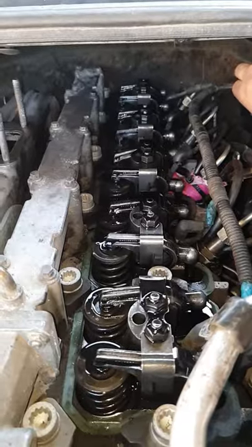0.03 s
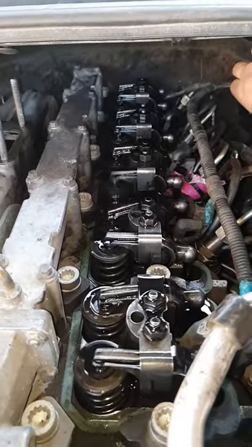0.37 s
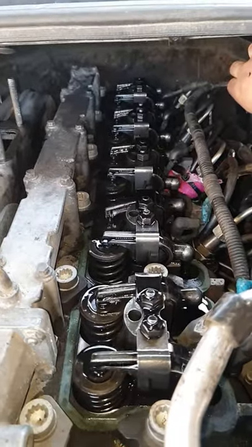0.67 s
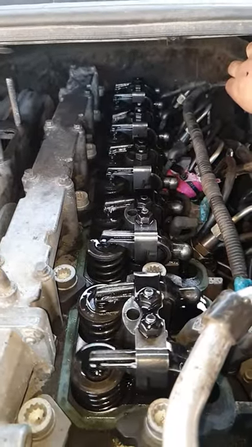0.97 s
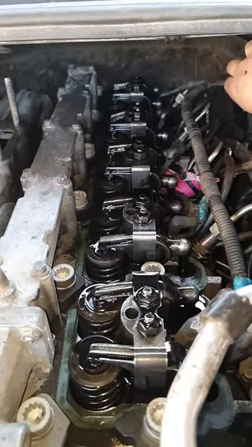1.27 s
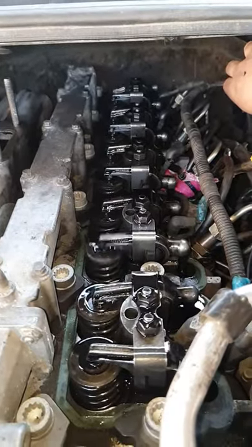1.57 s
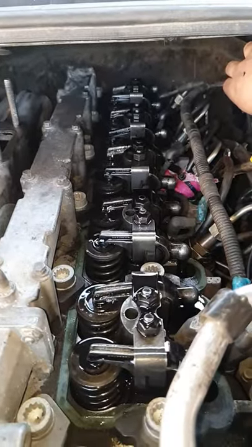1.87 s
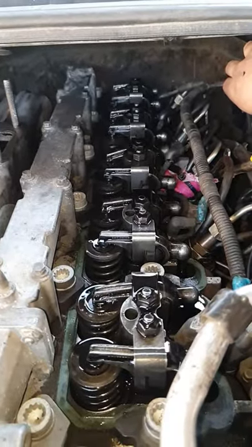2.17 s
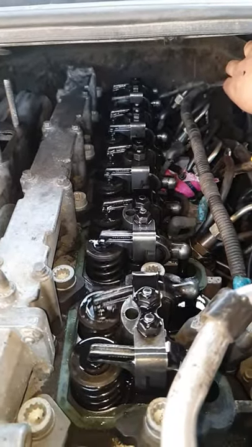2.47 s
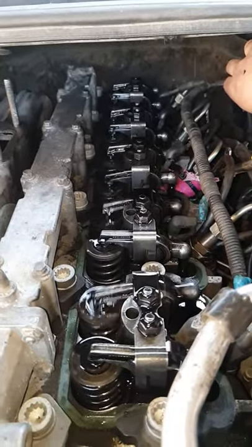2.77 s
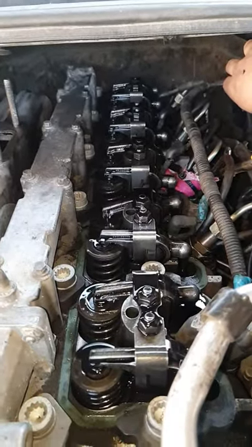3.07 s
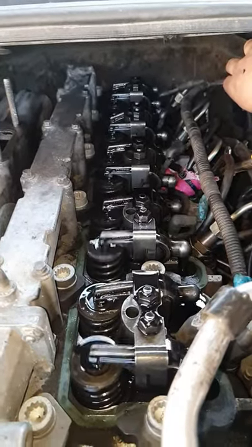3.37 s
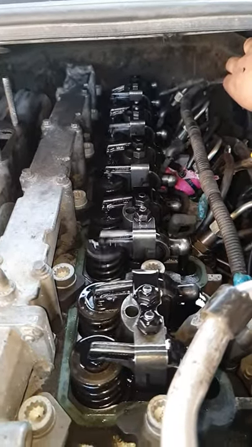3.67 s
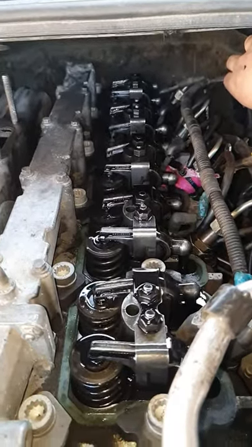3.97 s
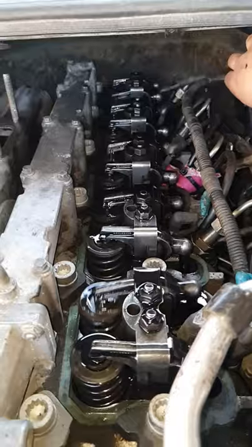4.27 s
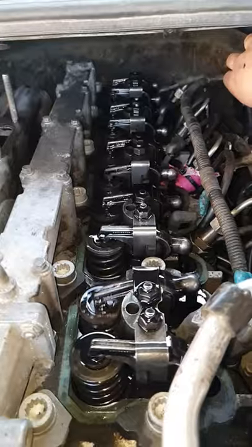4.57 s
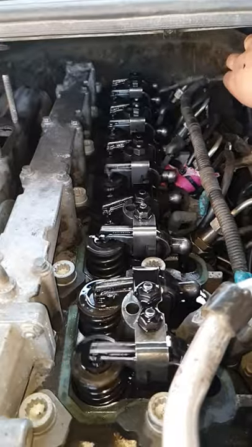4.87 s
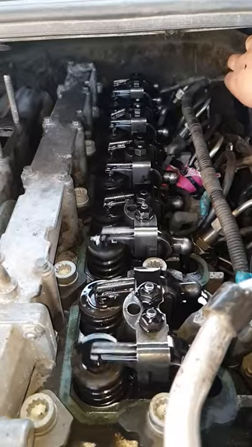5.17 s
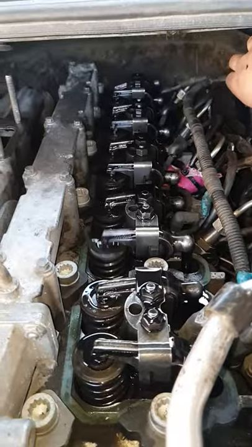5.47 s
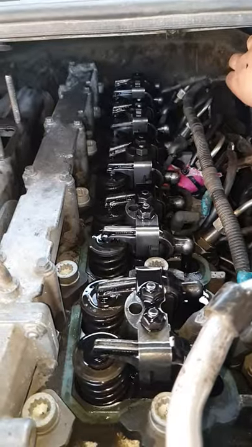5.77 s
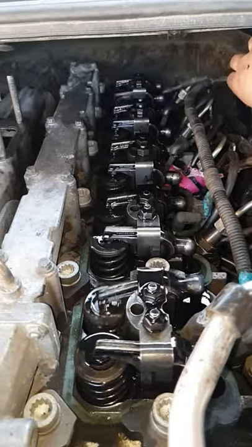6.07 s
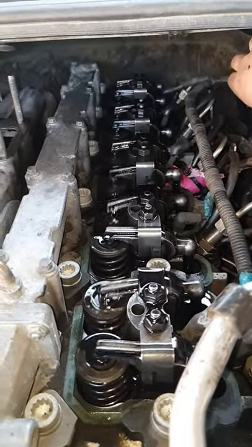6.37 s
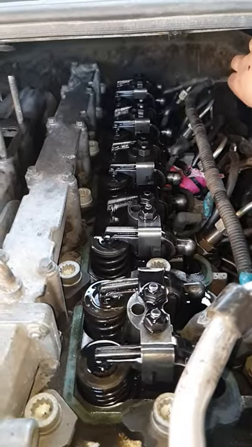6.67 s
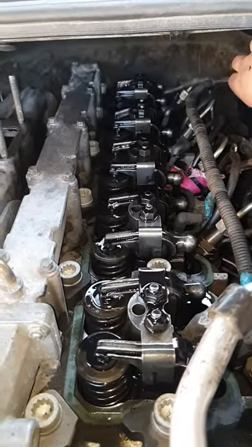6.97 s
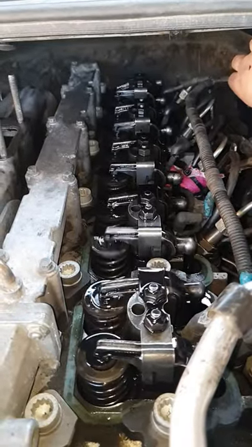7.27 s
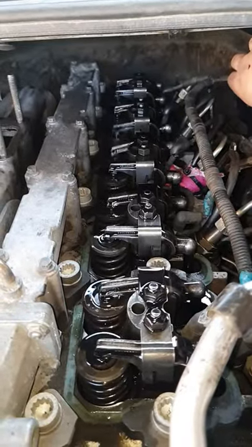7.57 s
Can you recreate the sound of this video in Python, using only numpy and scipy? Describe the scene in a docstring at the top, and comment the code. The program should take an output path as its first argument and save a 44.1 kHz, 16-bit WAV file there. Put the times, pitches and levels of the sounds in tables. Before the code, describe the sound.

Close, bright clatter of exposed rockers over the low throb, dull knocks and light hiss of an idling diesel engine.

```python
"""A diesel engine idles with its valve cover off, heard from just above the rockers.
From the start, air and oil hiss over the throb of a belt-driven fan, and each four-stroke cycle repeats
one pattern of impacts: bright ticks in the valve gear, dull knocks in the block, a dry combustion crack.
After a second the idle begins to creep up, and at about three seconds the crack softens.
The speed peaks at six seconds and then sinks back a little."""
import sys
import numpy as np
from scipy import signal
from scipy.fft import rfft, irfft, next_fast_len
from scipy.io import wavfile
from scipy.ndimage import uniform_filter1d

SR = 44100
rng = np.random.default_rng(int(sys.argv[2]) if len(sys.argv) > 2 else 0)


def wrap_up_sound(samples):
    """Save the sound to the file named by the first command line argument, as 16-bit audio."""
    columns = np.atleast_2d(samples).T
    # keep every value between -1 and 1, then stretch to whole-number steps
    tamed = np.clip(columns, -1, 1)
    steps = np.round(tamed * 32767).astype(np.int16)
    wavfile.write(sys.argv[1], SR, steps)


N = 345303
TIME = np.arange(N) / SR

# idle speed: t/s, crank speed/rpm
IDLE_SPEED = [(0, 1230.8), (1.07, 1234.4), (2.28, 1259.8), (3.09, 1256.6), (3.38, 1263.9), (4.38, 1260.2),
              (5.22, 1275.2), (6, 1278.1), (7.83, 1248)]
# blows of one cycle: crank angle/deg, then level/dB into the low, middle and high body modes
BLOWS = [(1.017, 50.6, 43.1, 37.64), (28.97, 10.0, 34.5, 27.7), (96.08, 34.2, 37.5, 25.4),
         (143.6, 45.3, 38, 29.3), (212.2, 12, 34.7, 27.6), (293.76, 48.5, 44.05, 34.7),
         (346.9, 17, 31.8, 30.3), (363.06, 38, 31.7, 24), (444, 15, 39.5, 11), (584.4, 49.3, 23.8, 25.8)]


def from_db(db):
    """Amplitude ratio: tenfold for every 20 dB."""
    return 10 ** (np.asarray(db) / 20)


def unit_rms(x):
    """Normalisation to unit mean power."""
    return x / np.sqrt(np.mean(x ** 2) + 1e-20)


def colour(x, spectrum, keep_power=True):
    """Spectral shaping; with keep_power, white noise retains its power."""
    size = next_fast_len(N + SR // 4)
    hz, level_db = np.transpose(spectrum)
    log_f = np.log(np.arange(size // 2 + 1) * SR / size + 1)
    gain = from_db(np.interp(log_f, np.log(hz), level_db, right=-100 if keep_power else None))
    return irfft(rfft(x, size) * (unit_rms(gain) if keep_power else gain), size)[..., :N]


def drift(rate_hz):
    """Slow random modulation: straight lines between Gaussian values."""
    knots = rng.standard_normal(400)
    return np.interp(TIME * rate_hz, np.arange(len(knots)), knots)


def resonance(x, hz, width_hz):
    """A damped oscillator: two poles, unit gain at the peak."""
    r = np.exp(-np.pi * width_hz / SR)
    feedback = [1, -2 * r * np.cos(2 * np.pi * hz / SR), r * r]
    return signal.lfilter(np.array([1, 0, -1]) * (1 - r * r) / 2, feedback, x + 1e-18)


def crank():
    """Phase is the integral of speed: times, and the cycles (two turns each) done by then."""
    t = np.arange(-SR // 4, N + SR // 4, 40) / SR
    cycles = np.cumsum(np.interp(t, *np.transpose(IDLE_SPEED))) * (t[1] - t[0]) / 120
    first_cycle_s = .0786
    return t, cycles - np.interp(first_cycle_s, t, cycles)


def onsets(degrees, jitter_ms):
    """Periodic excitation with play: the samples at which the crank passes an angle, once a cycle."""
    t, cycles = crank()
    passes = np.interp(np.arange(-1, int(cycles[-1])) + degrees / 720, cycles, t)
    return np.round(SR * (passes + jitter_ms / 1000 * rng.standard_normal(len(passes)))).astype(int)


def add(track, starts, bursts):
    """Superposition of bursts (cycles x samples) on a track."""
    at = starts[:, None] + np.arange(bursts.shape[-1])
    inside = (at >= 0) & (at < N)
    track[at[inside]] += bursts[inside]


def air_and_oil(rumble_left_db, rumble_right_db, coherence, hiss_db):
    """Broadband flow noise: the fan's draught rumbles, partly coherent; belts and oil spray hiss."""
    # noise spectra: f/Hz, relative level/dB
    rumble_spectrum = [(20, -20), (35, -20), (55, -3), (100, -1), (170, -2), (260, -13.5), (420, -15.5),
                       (700, -17), (1000, -27.5), (1500, -72)]
    hiss_spectrum = [(500, -3.5), (900, -3.5), (1400, -3.5), (2000, 1), (2600, -1), (3400, -4), (4700, -8),
                     (5800, -4), (6650, -1), (7900, -14.5), (9700, -2.5), (12000, -12.5), (15500, -18)]
    common = np.sqrt(coherence) * rng.standard_normal(N)
    draught = common + np.sqrt(1 - coherence) * rng.standard_normal((2, N))
    rumble = from_db([[rumble_left_db], [rumble_right_db]]) * colour(draught, rumble_spectrum)
    return rumble + from_db(hiss_db) * colour(rng.standard_normal((2, N)), hiss_spectrum)


def fan_throb(turns_per_cycle, waver_db):
    """Rotational noise: the fan, driven by the crank, sounds harmonics of its turning rate."""
    # fan tones: harmonic number, left level/dB, right level/dB
    harmonics = [(2, -45, -34.5), (3, -31, -28.5), (5, -34, -18.5), (7, -30, -48.5), (10, -32, -46)]
    angle = 2 * np.pi * turns_per_cycle * np.interp(TIME, *crank())
    throb = np.zeros((2, N))
    for order, left_db, right_db in harmonics:
        level_db = np.array([[left_db], [right_db]]) + waver_db * drift(rate_hz=10)
        throb += np.sqrt(2) * from_db(level_db) * np.sin(order * angle + 2 * np.pi * rng.random())
    return throb


def firing_hum(level_db, firings_per_cycle):
    """The fundamental of the firing rate: one soft pressure swing for each firing."""
    phase = 2 * np.pi * firings_per_cycle * np.interp(TIME, *crank())
    return np.sqrt(2) * from_db(level_db) * np.sin(phase)


def tick_envelope(t_ms, swell_ms, rattle_db=-10, decay_ms=9.8):
    """Powers add: a Gaussian swell at contact, then the dying rattle of spring and pushrod."""
    contact_power = np.exp(-(t_ms / swell_ms) ** 2)
    rattle = from_db(rattle_db) * np.exp(-np.maximum(t_ms, 0) / decay_ms)
    rattle_onset = (1 + np.tanh(t_ms / swell_ms)) / 2
    return np.sqrt(contact_power + rattle ** 2 * rattle_onset)


def valve_ticks(clack_db, ring_db, sizzle_db, ring_width_hz=910, jitter_ms=.22, uneven_db=.97):
    """Impact noise: a burst of tiny rebounds excites a clack, a rocker's ring and a steel sizzle."""
    # contacts of one cycle: crank angle/deg, swell t/ms, clack, ring and sizzle level/dB, ring f/Hz
    contacts = [(16.78, 0.97, -32, -27, -30, 6660), (42.03, 3.6, -31, -30.5, -27, 6550),
                (143.3, 1.4, -31.5, -27.5, -27.5, 6760), (195.3, 1.28, -30.5, -27.5, -29.5, 6780),
                (274.6, 0.9, -31, -21, -23.5, 6710), (301.4, 0.9, -32, -53, -41, 6500),
                (340, 0.81, -44.5, -30.5, -34.5, 6570), (480, 1.16, -33, -26.5, -31.5, 6400),
                (525.4, 1.5, -34.5, -25, -28, 6520), (591, 1.7, -38, -33.5, -30.5, 6550),
                (632.4, 2, -30.5, -31, -34, 6790), (699.3, 1.5, -26.5, -25, -29.5, 6680)]
    # contact spectra: f/Hz, relative level/dB
    clack_spectrum = [(700, -18), (1200, -2.5), (1500, -7), (2500, -6.5), (3600, -8.5), (4150, 2.5),
                      (4600, -7), (5400, 0.5), (5900, -5.5), (6500, -20)]
    sizzle_spectrum = [(7000, -15.5), (7800, -10), (8500, -5), (8900, -7), (9650, -0.5), (10300, -5),
                       (10600, -3), (11500, -8.5), (13000, -10.5), (15500, -16)]
    right_loss_db = (5, 2.5, 2)  # clack, ring, sizzle: the rockers lie nearer the left port
    grain_db, lead = 2.0, SR // 125
    t_ms = 1000 * np.arange(-lead, 3 * lead) / SR
    ring_gain = np.sqrt(2 * SR / np.pi / ring_width_hz)  # restores the power lost in the narrow band
    tracks = np.zeros((3, 2, N))
    for degrees, swell_ms, *parts_db, hz in contacts:
        at = onsets(degrees, jitter_ms) - lead
        rebounds = rng.standard_normal((3, 2, len(at), len(t_ms)))
        roughness = unit_rms(uniform_filter1d(rng.standard_normal((len(at), len(t_ms))), size=16))
        grains = unit_rms(from_db(grain_db * roughness))
        force = from_db(uneven_db * rng.standard_normal((len(at), 1)))
        bursts = rebounds * grains * force * tick_envelope(t_ms, swell_ms)
        bursts[1] = ring_gain * resonance(resonance(bursts[1], hz, ring_width_hz), hz, ring_width_hz)
        for part, (part_db, loss_db) in enumerate(zip(parts_db, right_loss_db)):
            add(tracks[part, 0], at, from_db(part_db) * bursts[part, 0])
            add(tracks[part, 1], at, from_db(part_db - loss_db) * bursts[part, 1])
    clack, ring, sizzle = tracks
    return (from_db(clack_db) * colour(clack, clack_spectrum) + from_db(ring_db) * ring
            + from_db(sizzle_db) * colour(sizzle, sizzle_spectrum))


def engine_bay(x, t60_s, wet_db):
    """Reverberation: dense short reflections from the metal all around, different at each port."""
    t = TIME[:SR // 8]
    tail = rng.standard_normal((2, len(t))) * from_db(-60 * t / t60_s)
    tail /= np.sqrt(np.sum(tail ** 2, axis=1, keepdims=True))
    return x + from_db(wet_db) * signal.fftconvolve(x, tail, axes=1)[:, :N]


def block_knocks(middle_db, high_db, level_db, jitter_ms=.03, uneven_db=.6):
    """Modal ringing: firings and piston slap strike block and head, a little differently each cycle."""
    # modes of block and head: f/Hz, bandwidth/Hz, level/dB
    modes = [(120, 44.8, -18), (179.2, 70.6, -14.5), (216.4, 28.6, -19), (315, 153, -27.5), (359, 14, -22),
             (379.2, 71.2, -4), (419.1, 48.6, 0.5), (438.2, 15.3, -3.5), (550, 91, -15.5),
             (619.4, 17.3, -5.5), (675.8, 23.9, 2.5), (896, 15, -16.5), (1122, 19, -22), (1232, 28, -24)]
    band_edges_hz = (260, 480)  # between the low, middle and high modes
    drive = np.zeros((3, N))
    for degrees, *strengths_db in BLOWS:
        at = onsets(degrees, jitter_ms)
        for track, strength_db in zip(drive, strengths_db):
            add(track, at, from_db(strength_db + uneven_db * rng.standard_normal((len(at), 1))))
    drive[1:] *= from_db([middle_db, high_db])
    ringing = np.zeros(N)
    for k, (hz, width_hz, mode_db) in enumerate(modes):
        band = np.searchsorted(band_edges_hz, hz)
        polarity = (-1) ** (k + 1)
        ringing += polarity * from_db(mode_db) * resonance(drive[band], hz, width_hz)
    return from_db(level_db) * ringing


def combustion_crack(crack_db, decay_ms, slap_db, slap_hz, slap_width_hz):
    """A heavily damped transient: the hardest firing opens each cycle with a slap and a dry crack."""
    # spectrum of the crack: f/Hz, relative level/dB
    crack_spectrum = [(500, -12), (650, -1), (800, -6), (1000, -14), (1250, -3), (1600, -15), (3000, -18)]
    at = onsets(BLOWS[0][0], jitter_ms=0)
    crack, impulses = np.zeros((2, N))
    t_ms = 1000 * TIME[:SR // 40]
    add(crack, at, rng.standard_normal((len(at), len(t_ms))) * np.exp(-t_ms / decay_ms))
    add(impulses, at, np.ones((len(at), 1)))
    slap = resonance(resonance(impulses, slap_hz, slap_width_hz), slap_hz, slap_width_hz)
    return from_db(crack_db) * colour(crack, crack_spectrum) + from_db(slap_db) * slap


def shadowed_port(x, lag_ms):
    """Acoustic shadow: sound reaches the right microphone port later and filtered."""
    # response of the right port: f/Hz, level/dB relative to the left
    shadow = [(100, 1.5), (200, -0.5), (400, -0.5), (620, -2), (800, -5.5), (1100, -5.5), (2000, 2.5),
              (2600, 0), (3150, -12.5), (6000, -5.5), (7200, -8.5), (8100, -16), (10200, -3.5), (15500, 0)]
    return np.interp(TIME - lag_ms / 1000, TIME, colour(x, shadow, keep_power=False))


def scene():
    """Superposition of all sources at the two microphone ports."""
    # the knock softens as the idle settles: t/s, relative crack level/dB
    harshness = [(0, 1.5), (2.9, 1.5), (3.3, -2.5), (6.9, -2), (7.5, -2.5)]
    harsh_db = np.interp(TIME, *np.transpose(harshness))
    rpm = np.interp(TIME, *np.transpose(IDLE_SPEED))
    middle_db = -1.47 + .035 * (rpm - rpm.mean())  # middle modes are struck harder at higher speed
    knocks = block_knocks(middle_db, high_db=-4.0 + .17 * harsh_db, level_db=-.88)
    crack = combustion_crack(crack_db=-24, decay_ms=2.15, slap_db=28.5, slap_hz=652, slap_width_hz=147)
    ticks = from_db(.21 * harsh_db) * valve_ticks(clack_db=.13, ring_db=-.26, sizzle_db=-.23)
    ticks = engine_bay(ticks, t60_s=.068, wet_db=-11.0)
    air = air_and_oil(rumble_left_db=-30.5, rumble_right_db=-21.0, coherence=.45, hiss_db=-34.5)
    left, right = air + ticks + knocks + from_db(harsh_db) * crack
    ports = np.array([left, shadowed_port(right, lag_ms=.31)])
    fan = fan_throb(turns_per_cycle=2.174, waver_db=.8)
    return ports + fan + firing_hum(level_db=-40.5, firings_per_cycle=5)


def record(dry):
    """Band limiting: a steep low-pass cuts the highest treble."""
    cutoff_hz = 15700
    return signal.sosfilt(signal.ellip(10, .2, 80, cutoff_hz, fs=SR, output="sos"), dry)


dry = scene()
out = record(dry)
wrap_up_sound(out)
```